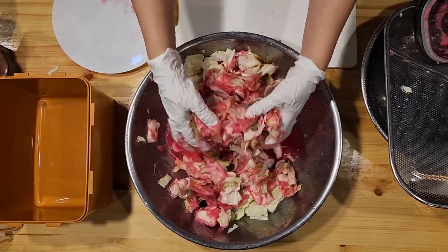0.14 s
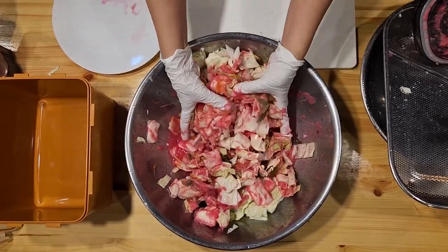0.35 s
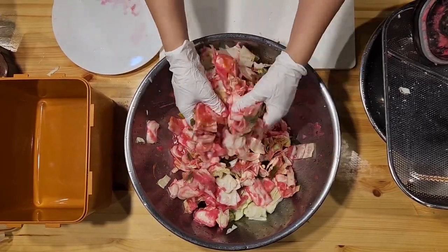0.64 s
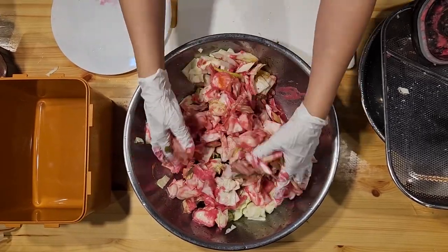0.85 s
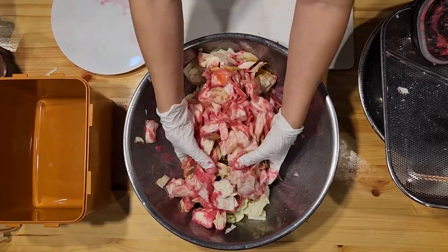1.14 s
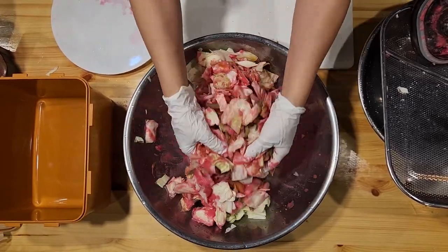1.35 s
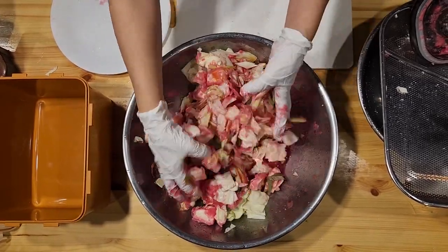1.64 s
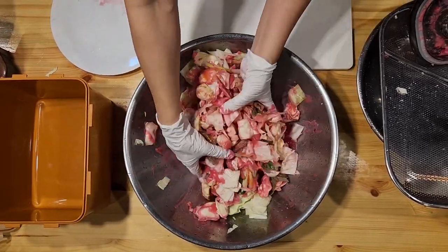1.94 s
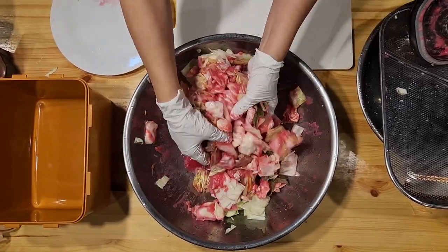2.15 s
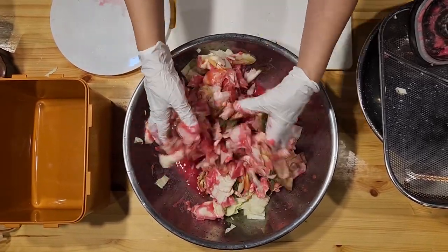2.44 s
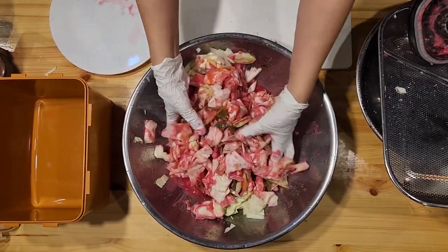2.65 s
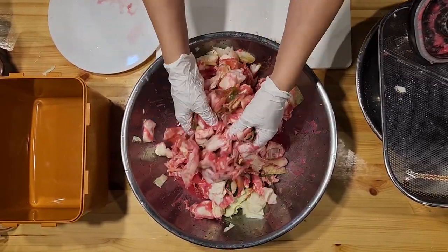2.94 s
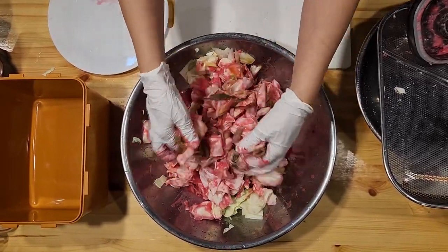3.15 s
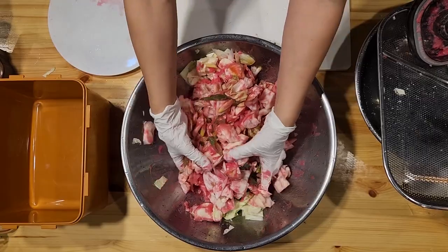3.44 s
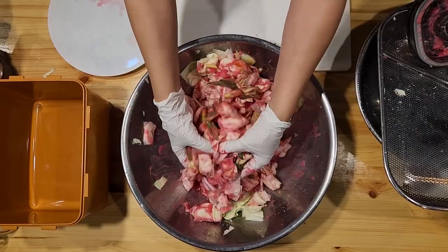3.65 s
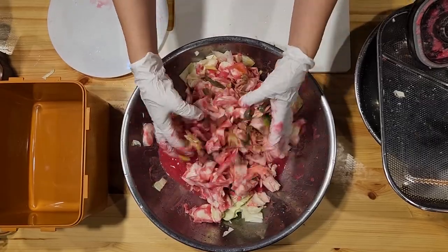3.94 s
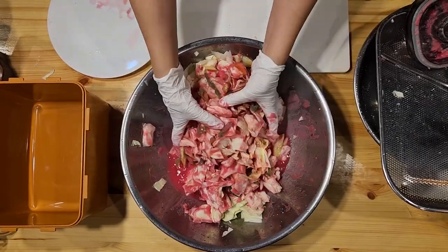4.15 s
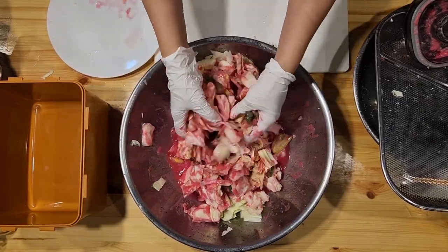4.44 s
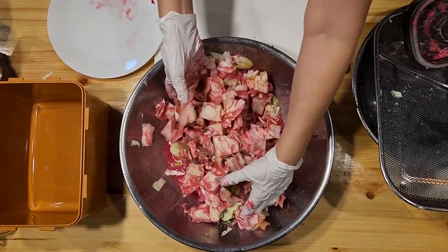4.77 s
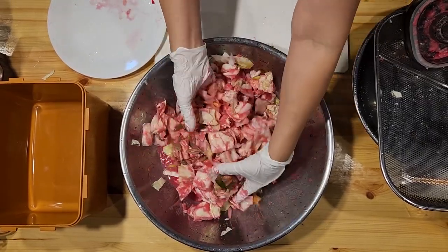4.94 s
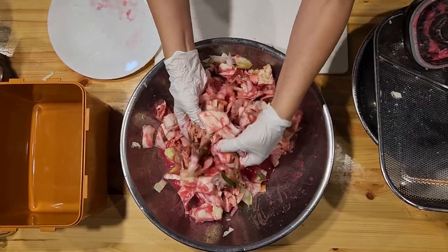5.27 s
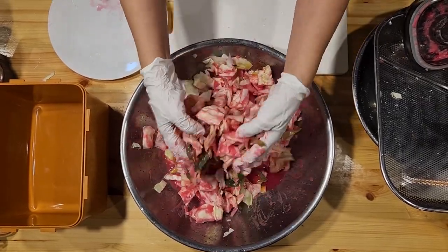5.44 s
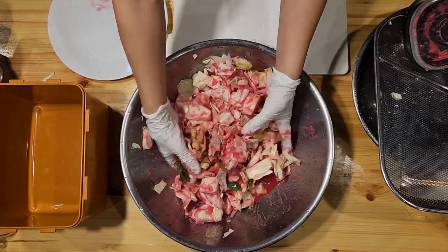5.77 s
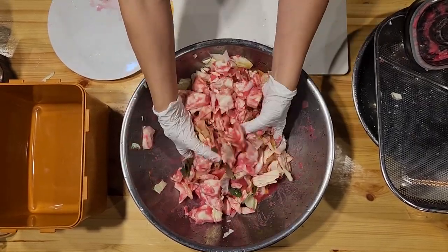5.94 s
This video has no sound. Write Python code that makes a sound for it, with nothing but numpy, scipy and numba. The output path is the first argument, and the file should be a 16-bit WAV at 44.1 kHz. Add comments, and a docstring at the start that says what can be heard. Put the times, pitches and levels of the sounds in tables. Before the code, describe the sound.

Wet, slippery squelching of cabbage mixed by hand in a metal bowl, in repeated bursts, chunks tumbling and low thumps over faint kitchen hum.

```python
"""Wet cabbage in a steel bowl

Gloved hands toss and squeeze wet cabbage. Air pockets in the paste and between tumbling chunks ring as
short gliding tones; juice films and gloves crackle as puffs of noise; the load thuds into the table by
exciting its resonances. The bowl and a short room tail ring along, over shaped noise and the tones of a
fridge. A two-port microphone colours it all, and its input clips peaks beyond full scale."""
import sys
import numpy as np
from scipy import signal
from scipy.fft import rfft, irfft, next_fast_len
from scipy.io import wavfile
from scipy.ndimage import uniform_filter1d
from numba import njit

SR = 44100
rng = np.random.default_rng(int(sys.argv[2]) if len(sys.argv) > 2 else 0)


def file_out(sig):
    """Save sig as 16-bit WAV at sys.argv[1]."""
    # one column per channel
    cols = np.atleast_2d(sig).T
    # limit, then scale
    lim = np.clip(cols, -1, 1)
    pcm = np.round(lim * 32767).astype(np.int16)
    wavfile.write(sys.argv[1], SR, pcm)


N = 269477

# Tosses of the load. Each row: start of the dig in seconds, rise in seconds, delay of the falling chunks
# and slop in seconds, hold of the hands in seconds, sag during the hold in dB per second, decay of the
# hands' sounds in dB per second, levels of paste, chunks, slop on the bowl bottom, film crackle and glove
# rustle in dB, pitch of small pockets and of pockets between chunks a quarter second into the toss in Hz.
TOSS_ROWS = [(-0.2, 0.088, .05, 0.1, 13, 74, -17.5, -25.5, -24, -23.5, -25.5, 1840, 770),
             (0.319, 0.091, 0.039, .2, 21, 82, -19, -21, -30.5, -29.5, -40.5, 1730, 973),
             (1.007, 0.13, 0.026, 0.053, 22, 46, -16, -19, -23, -30.5, -40, 2030, 829),
             (1.747, 0.12, 0.043, 0.38, 32.5, 166, -16.5, -21.5, -29, -28.5, -39, 1865, 772),
             (2.638, 0.059, 0.014, 0.25, 3, 96, -19, -24.5, -35, -34, -45, 1996, 823),
             (3.337, 0.12, 0.023, .24, 3.5, 79, -20, -27, -37, -34, -40, 1760, 753),
             (4.136, 0.099, 0.018, 0.24, 17.5, 137, -18, -24, -28.5, -29, -37.5, 1750, 923),
             (4.833, 0.11, 0.038, 0.38, 26, 117, -15, -19, -24.5, -24, -31, 1920, 803),
             (5.763, 0.043, 0.07, 0.24, 12.5, 74, -18.5, -19.5, -26.5, -31, -45.5, 1730, 725)]
# The load landing on the bowl bottom. Each row: end of the rise in seconds, hold in seconds, levels of
# the table top, of the deep sway of the legs and of the slop in dB.
LANDING_ROWS = [(0.38, 0.018, -28, -52, -51), (0.45, 0.017, -17, -58, -23.5), (1.03, .01, -37, -56, -47),
                (1.129, .03, -52, -37, -28), (1.886, 0.072, -25, -54, -23.5),
                (2.692, 0.038, -23.5, -43, -36), (3.366, 0.046, -26.5, -43, -34),
                (3.522, 0.13, -34, -46, -30.5), (4.08, 0.018, -30, -52, -53), (4.2, 0.031, -20, -44, -31.5),
                (4.806, 0.047, -35, -55, -48), (4.91, 0.099, -21.5, -27, -36), (5.83, .02, -31, -40, -47),
                (5.963, 0.019, -23, -58, -45)]
STEP_S = 0.001  # time step of the movements
BIGGEST_DB = 12  # limit on random pocket sizes; slips stay under half of it


def undb(db):
    """Decibels express an amplitude ratio: 20 dB is a factor of ten."""
    return 10 ** (np.asarray(db) / 20)


def unit(x):
    """Normalization: division by the root mean square gives an rms of one."""
    return x / np.sqrt(np.mean(x ** 2))


def decay(x, t60):
    """Exponential decay: each impulse falls by 60 dB in t60 seconds."""
    return signal.lfilter([1], [1, -np.exp(-np.log(1000) / (t60 * SR))], x)


def colour(x, points):
    """Spectral filtering: gain in dB is interpolated over log frequency between (Hz, dB) points."""
    hz, db = np.transpose(points)
    size = next_fast_len(N)
    f = np.maximum(np.arange(size // 2 + 1) * SR / size, 1)
    gain = undb(np.interp(np.log(f), np.log(hz), db))
    return irfft(rfft(x, size) * gain, size)[..., :N]


def resonance(x, hz, width):
    """Resonance: a damped mode passes a band of the given width in Hz."""
    return signal.lfilter(*signal.iirpeak(hz, hz / width, fs=SR), x)


def swell(start, rise, hold, fall_db, sag_db=0):
    """Force envelope of one movement: it rises, sags while held, then decays at a steady dB rate."""
    dig_from_db = -22.5
    t = np.arange(0, N / SR, STEP_S) - start
    db = dig_from_db * np.clip(1 - t / rise, 0, 1) - sag_db * np.clip(t - rise, 0, hold)
    return (t > 0) * undb(db - fall_db * np.maximum(t - rise - hold, 0))


def together(shapes, db, rest_db):
    """Incoherent superposition: movements add in power over a resting level."""
    gain = np.sqrt(undb(db) ** 2 @ np.square(shapes) + undb(rest_db) ** 2)
    return np.interp(np.arange(N) / SR, np.arange(len(gain)) * STEP_S, gain)


def kitchen():
    """Steady background: filtered noise, coherent at both ports in the bass, plus the fridge's sine tones."""
    # Spectrum of the air noise. Each row: frequency in Hz, relative gain in dB.
    air_points = [(15, -41), (25, 9), (102, 12), (175, -50), (223, 4), (451, -22), (1440, -4), (2160, 13.5),
                  (2910, -4.5), (11600, -11), (16000, -53)]
    # Fridge tones. Each row: frequency in Hz, rms level in dB.
    hum_tones = [(108, -57), (226, -58)]
    air_db = -41.5
    mid, side = rng.standard_normal((2, N))
    side = colour(side, [(30, -30), (100, -8), (3000, -0.5)])
    air = unit(colour(mid + side * np.array([[1], [-1]]), air_points)) * undb(air_db)
    t = np.arange(N) / SR
    hum = sum(np.sqrt(2) * undb(db) * np.sin(2 * np.pi * hz * t) for hz, db in hum_tones)
    return air + hum


def room(x):
    """Diffuse reverberation: a decaying noise tail from bowl and walls, its ports differing more with pitch."""
    t60_s, level_db = 0.12, -10
    t = np.arange(SR // 3) / SR
    tail = rng.standard_normal((2, len(t))) * np.exp(-np.log(1000) * t / t60_s) * (t > 0.002)
    tail = tail / np.sqrt(np.sum(tail ** 2, axis=1, keepdims=True))
    mid, side = signal.fftconvolve(x.mean(axis=0, keepdims=True), tail, axes=1)[:, :N]
    side = colour(side, [(150, -6.5), (3500, 5.5)])
    return undb(level_db) * (mid + side * np.array([[1], [-1]]))


def thuds():
    """Forced vibration: soft uneven pushes of the load ring the table top; the legs sway deeper."""
    # Modes of the table top. Each row: frequency in Hz, width of each of two passes in Hz, relative level in dB.
    table_modes = [(80.4, 17, -4), (112.4, 21.4, 0), (126, 29, -8.5)]
    sway_hz, sway_width_hz = 47.5, 16  # width of each of two passes
    rise_s, fall_db_per_s = 0.043, 305
    full_s, hold, top_db, sway_db, _ = np.transpose(LANDING_ROWS)
    lands = [swell(at - rise_s, rise_s, h, fall_db_per_s) for at, h in zip(full_s, hold)]
    push = rng.standard_normal(N)
    top = 0
    for hz, width, db in table_modes:
        top = top + undb(db) * unit(resonance(resonance(push, hz, width), hz, width))
    sway = unit(resonance(resonance(push, sway_hz, sway_width_hz), sway_hz, sway_width_hz))
    return unit(top) * together(lands, top_db, -54) + sway * together(lands, sway_db, -56), lands


@njit
def ring(out, start, hz, cycles, glide, damp, size, turn):
    """Bubble resonance: a pocket swells, rings with rising pitch and closes, phase-shifted at the right port."""
    for k in range(len(start)):
        length = int(cycles[k] * SR / hz[k])
        p = np.exp(2j * np.pi * hz[k] / SR - damp / length)
        bend = np.exp(2j * np.pi * hz[k] / SR * glide / length)
        z = 1 + 0j
        for i in range(min(length, out.shape[1] - start[k])):
            z, p = z * p, p * bend
            opening = np.sqrt(np.sin(np.pi * i / length))
            out[0, start[k] + i] += size[0, k] * opening * z.imag
            out[1, start[k] + i] += size[1, k] * opening * (z * turn[k]).imag
    return out


def pockets(s, hz, cycles, db, pan_db, lag, glide=0.21, damp=1.48):
    """Superposition of ringing pockets, with level and phase differences between the two ports."""
    port_lag_s = 0.00006  # spread of arrival time between the ports
    size = undb(db + np.array([pan_db, -pan_db]) / 2)
    turn = np.exp(2j * np.pi * hz * port_lag_s * lag)
    start = (s * SR).astype(np.int64)
    return ring(np.zeros((2, N)), start, hz, np.maximum(cycles, 2.), glide, damp, size, turn)


def swarm(kinds, s, favoured_hz):
    """Random bubble population: pockets of several sizes, pulled by the squeeze towards one pitch."""
    out = 0
    for hz, pull, spread, cycles, rate, scatter_db, db in kinds:
        count = int(rate * N / SR)
        when = rng.random(count) * N / SR
        pitch, lag, pan = rng.standard_normal((3, count))
        size_db = np.minimum(scatter_db * rng.exponential(size=count), BIGGEST_DB)
        centre = hz * (np.interp(when, s, favoured_hz) / hz) ** pull
        tune = np.minimum(centre * 2 ** (spread * pitch), SR / 3)
        one = pockets(when, tune, np.full(count, 1. * cycles), size_db, 2.1 * pan, lag)
        out = out + undb(db) * unit(one)
    return unit(out)


def favoured(hz, sag):
    """Resonance falls with pocket size: pitch sinks through a toss by sag octaves per second and wanders."""
    wander_oct = 0.081  # rms
    t = np.arange(0, N / SR, 0.01)
    start = np.transpose(TOSS_ROWS)[0]
    toss = np.searchsorted(start, t, side="right") - 1
    wander = unit(uniform_filter1d(rng.standard_normal(len(t)), size=5))
    return t, hz[toss] * 2 ** (wander_oct * wander - sag * (t - start[toss] - 0.25))


def bunching(rate=45, scatter_db=19.5, t60=0.033):
    """Stick-slip friction: leaves slip in jerks, each starting sharply and dying away."""
    size_db = np.minimum(scatter_db * rng.exponential(size=N), BIGGEST_DB / 2)
    slips = (rng.random(N) < rate / SR) * undb(size_db)
    return unit(decay(slips, t60) + 1.1)


def slop(large):
    """Bubble resonance at low pitch: large pockets in the slop on the bowl bottom."""
    # Pocket kinds. Each row: centre in Hz, pull to the favoured pitch from 0 to 1, spread in octaves,
    # length in cycles, pockets per second, size scatter in dB, relative level in dB.
    slop_kinds = [(341.8, 0.091, 0.24, 8.6, 250, 2.3, 3), (220, 0.078, 0.33, 1, 130, 2.4, -10.5)]
    return swarm(slop_kinds, *large)


def crackle(points):
    """Impulsive noise: tiny decaying puffs over a finer sizzle, uncorrelated at the two ports."""
    ticks = (rng.random(N) < 400 / SR) * undb(3.2 * rng.exponential(size=N))
    puffs = decay(ticks, 0.0041) + 1.5
    return unit(colour(puffs * rng.standard_normal((2, N)), points))


def gloves(slips):
    """Frictional noise: gloves rustle in step with the slips."""
    # Rustle spectrum. Each row: frequency in Hz, relative gain in dB.
    rustle_points = [(6000, -23), (9000, -8), (12000, -10), (16000, -11)]
    return unit(slips ** 0.81 * crackle(rustle_points))


def films(slips, small):
    """Film rupture: juice films give puffs of noise and short ringing pockets, bunched by the slips."""
    # Crackle spectrum. Each row: frequency in Hz, relative gain in dB.
    crackle_points = [(1760, -39), (3000, -0.5), (3780, -5.5), (4730, -5.5), (5550, -4.5), (9000, -8.5),
                      (11700, -22), (19800, -120)]
    # Film pockets. Each row: centre in Hz, pull to the favoured pitch from 0 to 1, spread in octaves,
    # length in cycles, pockets per second, size scatter in dB, relative level in dB.
    film_kinds = [(5500, 0.18, 0.474, 8.3, 550, 5.6, 0)]
    return unit(slips ** 0.69 * (crackle(crackle_points) + 0.5 * swarm(film_kinds, *small)))


def snaps():
    """Impulsive release: juice films and glove folds snap as noise bursts, each brightest at its own centre."""
    # Single snaps. Each row: start in seconds, level in dB, centre in Hz.
    snap_rows = [(0.017, -4.5, 11700), (0.107, -5.5, 10800), (0.322, 1, 11600), (0.3576, -7, 6480),
                 (0.373, 11.5, 5740), (1.0155, -9.5, 4050), (1.3079, -11.5, 6830), (1.3587, -7, 4730),
                 (1.423, -6, 3730), (1.594, -11, 3980), (1.6894, -7, 15100), (1.7616, -9, 5270),
                 (1.8036, -3, 4700), (2.359, -12.5, 4360), (2.537, -16, 6330), (2.651, -8.5, 4490),
                 (2.775, -10, 5400), (2.839, -8, 5800), (2.867, -12.5, 10800), (3.0131, -10, 5740),
                 (3.0615, -8.5, 11900), (3.2074, -11, 4030), (3.342, -8, 4200), (3.4047, -7, 5900),
                 (3.5426, -8, 5710), (4.146, -4, 4800), (4.6583, -17.5, 5800), (4.791, -11, 4200),
                 (4.9054, -6.5, 5930), (4.9571, -24, 4130), (4.9771, -11, 4310), (4.9926, -18, 5320),
                 (5.596, -15, 4240), (5.6436, -16, 6730), (5.7478, -1.5, 5460), (5.9783, -12.5, 4750)]
    t60_s = 0.021
    out = np.zeros((2, N + SR))
    t = np.arange(SR // 20) / SR
    shape = (1 - np.exp(-t / 0.0004)) * np.exp(-np.log(1000) * t / t60_s)
    for s, db, hz in snap_rows:
        noise = rng.standard_normal((2, len(t)))
        burst = resonance(noise, hz, 0.5 * hz) + 0.089 * noise
        first = int(s * SR)
        out[:, first:first + len(t)] += undb(db) * shape * burst
    return out[:, :N]


def chunks(slips, large):
    """Cavity resonance: pockets between tumbling chunks ring, hardly bunched by the slips."""
    # Pocket kinds. Each row: centre in Hz, pull to the favoured pitch from 0 to 1, spread in octaves,
    # length in cycles, pockets per second, size scatter in dB, relative level in dB.
    tumble_kinds = [(680, 0.97, 0.289, 10.4, 500, 4, -1.5), (839, 0.16, 0.395, 6.1, 600, 6.7, -1.5)]
    return unit(slips ** 0.037 * swarm(tumble_kinds, *large))


def pops():
    """Bubble resonance: big air pockets pop one by one, each a decaying tone of slightly rising pitch."""
    # Single pockets. Each row: start in seconds, level in dB, starting pitch in Hz, length in cycles.
    pop_rows = [(0.317, 2, 2070, 13.6), (0.3224, -7, 2030, 13), (0.3353, -4, 2140, 7.8),
                (0.3703, -9, 2130, 8.8), (0.3768, 5, 2210, 4.8), (0.428, -6.5, 1390, 11),
                (0.549, 0, 1600, 4.2), (0.569, 2.5, 1315, 5.2), (0.6257, -3.5, 1380, 5.5),
                (0.7792, -16.5, 1430, 7.8), (1.0856, -8.5, 1830, 24), (1.1144, -2.5, 2105, 12),
                (1.1505, -7, 1606, 29), (1.2102, -2, 1710, 11), (1.242, -4.5, 1450, 5.6),
                (1.3533, -8.5, 2080, 24), (1.4225, -11, 2300, 7), (1.4426, -1, 2400, 2.5),
                (1.4592, -3.5, 1720, 31), (1.4692, 5.5, 1950, 4.2), (1.7208, -18.5, 1750, 5),
                (1.7782, -6.5, 2000, 6.9), (1.8, 3, 1870, 5.4), (2.0782, -6.5, 2050, 18),
                (2.262, -15, 1340, 8.9), (2.6983, -0.5, 2130, 7.3), (2.773, -9, 1000, 6.9),
                (2.835, -11, 1800, 19), (2.859, -13, 1620, 11), (2.9257, -4, 1520, 5),
                (3.251, -21, 1380, 9.2), (3.3587, -9, 2000, 5.3), (3.5147, 3.5, 1640, 9.6),
                (3.541, 4.5, 2190, 13.6), (3.546, 7.5, 1830, 12), (3.5624, -6, 2300, 5.1),
                (3.6478, -4, 1375, 8.2), (3.7315, -9, 1820, 6.7), (3.935, -19.5, 2040, 10),
                (4.017, -16.5, 1880, 8.7), (4.146, -8, 1420, 6.7), (4.161, -9, 1540, 7.3),
                (4.2116, -6.5, 1260, 6.6), (4.2743, -1, 1790, 4.2), (4.2815, -1.5, 1380, 5.3),
                (4.296, -14, 1570, 6.2), (4.3118, -5, 1820, 5.5), (4.755, -13.5, 1860, 5.2),
                (4.9583, 2.5, 2560, 3.4), (4.9925, 10.5, 2230, 5), (5.113, -1, 2080, 4.9),
                (5.136, -1, 1120, 4.4), (5.5966, -17.5, 2200, 5.4), (5.6466, -19, 1650, 8.6),
                (5.7483, -8.5, 2220, 6.6), (5.8641, -11, 1790, 13), (5.892, 1, 1680, 2.6),
                (5.968, -1, 1370, 3.5), (6.0214, 2.5, 1450, 2.6)]
    when, db, hz, cycles = np.transpose(pop_rows)
    pan, lag = rng.standard_normal((len(pop_rows), 2)).T
    return pockets(when, hz, cycles, db, pan, lag, glide=0.048, damp=1.0)


def paste(slips, small):
    """Bubble resonance: small pockets squelch in the paste, bunched by the slips."""
    # Pocket kinds. Each row: centre in Hz, pull to the favoured pitch from 0 to 1, spread in octaves,
    # length in cycles, pockets per second, size scatter in dB, relative level in dB.
    squelch_kinds = [(1870, 0.88, 0.23, 6.4, 1000, 5.5, -7.5), (1858, 0.4, 0.31, 5.45, 1100, 3.5, -4.5),
                     (3180, 0.21, 0.29, 3.3, 1100, 2.5, -11), (1760, 0.97, 0.31, 3.9, 180, 7.5, -8.5)]
    return unit(slips ** 0.6 * swarm(squelch_kinds, *small))


def steel_bowl(wet):
    """Sympathetic resonance: the modes of the loaded steel ring along with the wet sounds."""
    # Bowl modes. Each row: frequency in Hz, width in Hz, level relative to the wet sounds in dB.
    bowl_modes = [(585.3, 27, -2), (701, 13.6, 2.5), (910, 12, -34), (1054, 20.7, 1), (1430, 210, -14),
                  (2218, 39, -8.5)]
    return wet + sum(undb(db) * resonance(wet, hz, width) for hz, width, db in bowl_modes)


def scene():
    """Superposition: hand movements scale the wet sounds in the bowl, added to room, table, slop and kitchen."""
    # Fingers closing on a handful. Each row: start in seconds, hold in seconds, levels of paste, chunks,
    # film crackle and glove rustle in dB.
    grab_rows = [(0.01, 0.013, -30, -44, -42, -25.5), (0.095, 0.015, -36, -31, -25, -33),
                 (0.146, 0.035, -32, -44.5, -32, -42), (0.305, 0.088, -30, -47, -20.5, -26),
                 (0.554, 0.076, -21, -27, -30.5, -34), (0.631, 0.027, -37, -30.5, -26, -37),
                 (0.757, 0.022, -34, -45, -45, -53), (0.915, 0.022, -35, -58, -31.5, -52),
                 (1.017, 0.062, -21.5, -35, -28.5, -30), (1.182, 0.047, -15, -22, -32, -37),
                 (1.342, 0.011, -22, -38, -35, -33), (1.409, 0.08, -20.5, -39, -35.5, -29.5),
                 (1.599, 0.019, -55, -54, -36, -40), (1.7, 0.086, -30, -40.5, -37, -36),
                 (1.749, 0.051, -23.5, -36, -32, -29), (2.166, 0.12, -24.5, -38.5, -32, -38.5),
                 (2.354, 0.023, -34.5, -53, -42, -43), (2.459, 0.034, -36.5, -52, -61, -58),
                 (2.524, 0.075, -40, -59, -37, -43), (2.653, 0.05, -27, -35, -29, -27.5),
                 (2.86, 0.016, -21, -23.5, -23, -27), (2.895, 0.036, -21.5, -19.5, -31.5, -34),
                 (2.942, 0.029, -18.5, -30, -36, -42), (3.001, 0.064, -28, -51, -29, -38),
                 (3.135, 0.018, -34, -62, -36, -55), (3.2, 0.022, -36, -57, -49, -48),
                 (3.346, 0.014, -25.5, -29, -30.5, -32), (3.387, 0.037, -24, -52, -27.5, -26.5),
                 (3.522, 0.047, -17, -45, -28.5, -49), (3.604, 0.028, -19, -22.5, -46, -46),
                 (4.058, 0.044, -34, -55, -38.5, -37), (4.141, .03, -22.5, -36, -31, -30.5),
                 (4.272, 0.048, -14.5, -28, -30, -26), (4.741, 0.047, -62, -68, -32.5, -35),
                 (4.986, 0.05, -1.5, -24.5, -15, -18.5), (5.104, 0.057, -12.5, -15.5, -31.5, -40),
                 (5.212, 0.042, -18.5, -21.5, -40, -38), (5.466, 0.015, -29.5, -58, -32.5, -61),
                 (5.622, 0.07, -32, -55, -31, -32), (5.745, 0.013, -47, -58, -26, -37),
                 (5.874, 0.018, -16, -24, -37, -44), (5.97, .04, -35, -22, -53, -62)]
    grab_rise_s, grab_fall_db_per_s = 0.012, 392
    chunks_end_early_s, slop_ends_early_s = 0.024, 0.11
    (s, rise, late, hold, sag_db, fall_db, paste_db, chunk_db, slop_db, film_db, glove_db,
     small_hz, large_hz) = np.transpose(TOSS_ROWS)
    grab_s, grab_hold, grab_paste_db, grab_chunk_db, grab_film_db, grab_glove_db = np.transpose(grab_rows)
    moves = list(zip(s, rise, late, hold, fall_db, sag_db))
    hands = [swell(a, r, h, f, g) for a, r, _, h, f, g in moves]
    grabs = [swell(a, grab_rise_s, h, grab_fall_db_per_s) for a, h in zip(grab_s, grab_hold)]
    # chunks and slop start later than the hands, end earlier and die away faster
    falling = [swell(a + d, r, h - d - chunks_end_early_s, 1.38 * f, g) for a, r, d, h, f, g in moves]
    slopping = [swell(a + d, r, h - d - slop_ends_early_s, 1.68 * f, g) for a, r, d, h, f, g in moves]

    small, large = favoured(small_hz, 0.39), favoured(large_hz, 0)
    slips = bunching()
    # the resting levels are the heap settling between tosses
    wet = paste(slips, small) * together(hands + grabs, np.r_[paste_db, grab_paste_db], -48)
    wet = wet + chunks(slips, large) * together(falling + grabs, np.r_[chunk_db, grab_chunk_db], -60.5)
    wet = wet + films(slips, small) * together(hands + grabs, np.r_[film_db, grab_film_db], -45)
    wet = wet + gloves(slips) * together(hands + grabs, np.r_[glove_db, grab_glove_db], -53)
    bowl = steel_bowl(wet + pops() + snaps())

    table, lands = thuds()
    land_slop_db = np.transpose(LANDING_ROWS)[4]
    bottom = slop(large) * together(slopping + lands, np.r_[slop_db, land_slop_db], -60)
    return bowl + room(bowl) + table + bottom + kitchen()


def record(dry):
    """Transduction: the ports colour the treble, the deep bass drops, the input clips and the top is cut."""
    # Colour of the ports. Each row: frequency in Hz, gain in dB.
    mic_points = [(7000, -1), (8600, -5), (11600, 5), (13800, -3.5), (15200, 0)]
    bass_cut_hz, top_hz = 35, 15900
    bass_cut = signal.butter(2, bass_cut_hz, "high", fs=SR, output="sos")
    heard = signal.sosfilt(bass_cut, colour(dry, mic_points))
    top_cut = signal.ellip(10, 0.2, 80, top_hz, fs=SR, output="sos")
    return signal.sosfilt(top_cut, np.clip(heard, -1, 1))


dry = scene()
out = record(dry)
file_out(out)
```